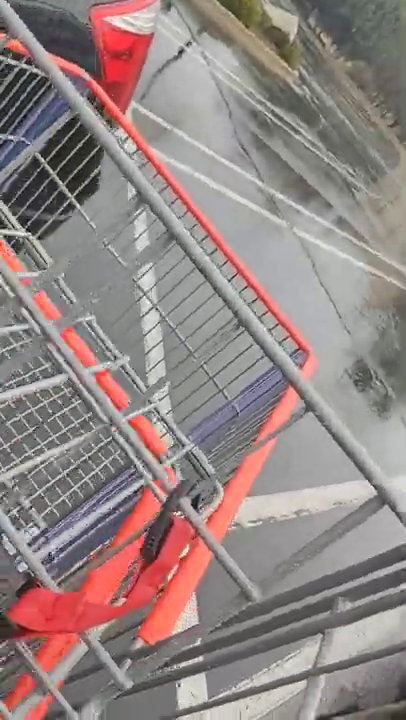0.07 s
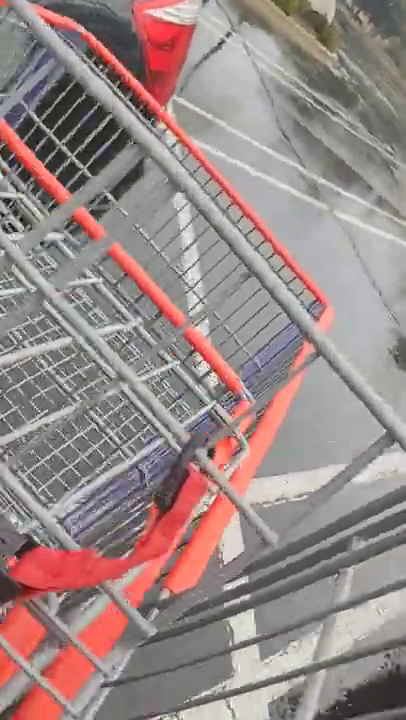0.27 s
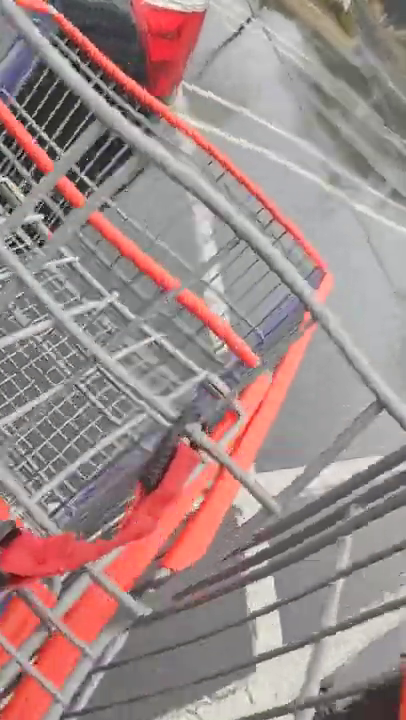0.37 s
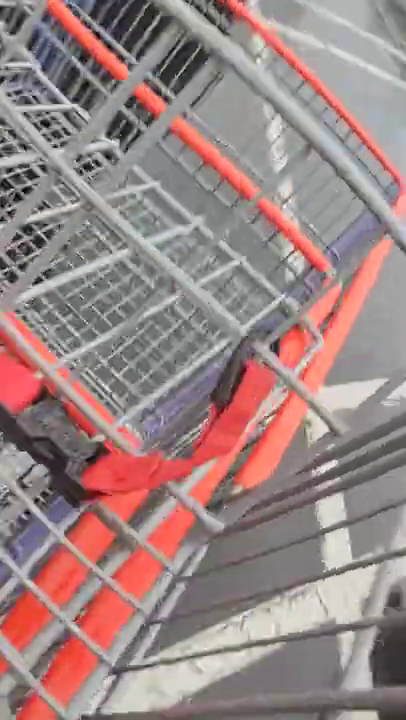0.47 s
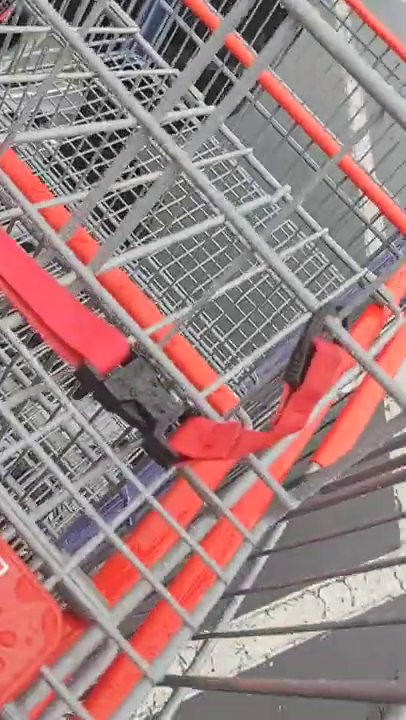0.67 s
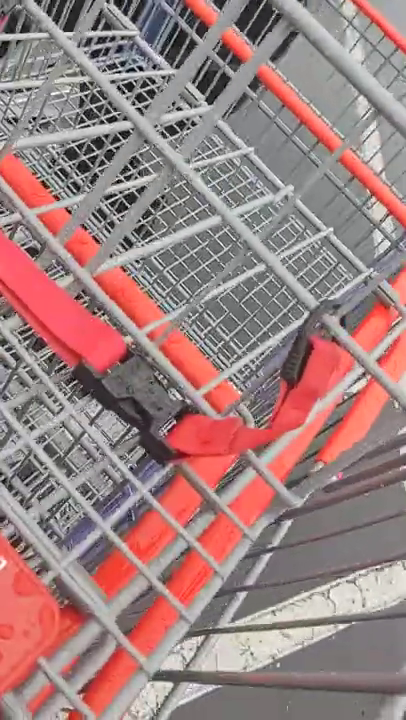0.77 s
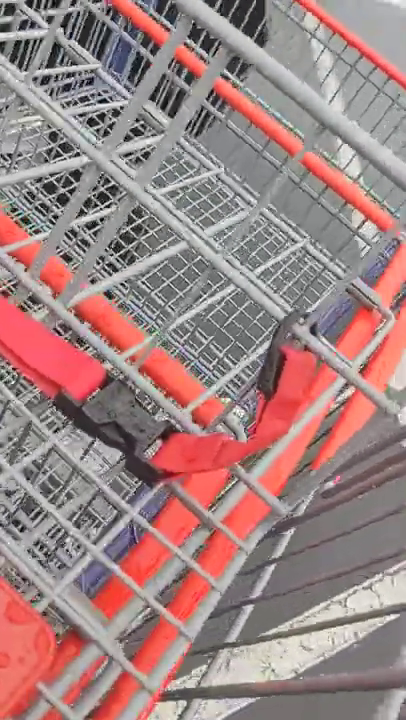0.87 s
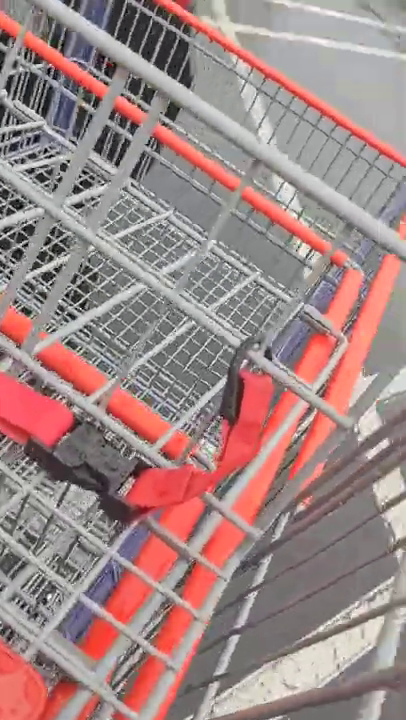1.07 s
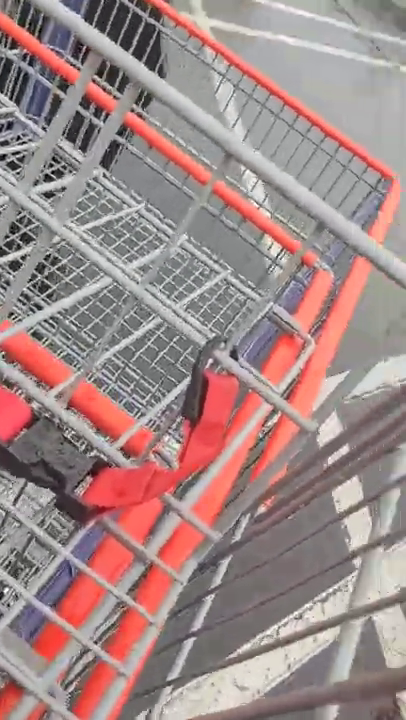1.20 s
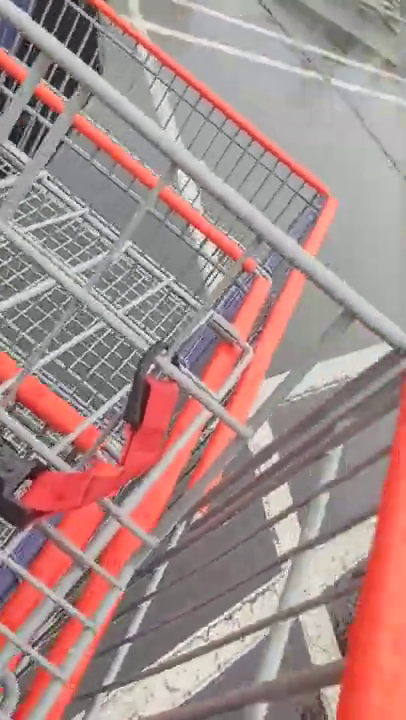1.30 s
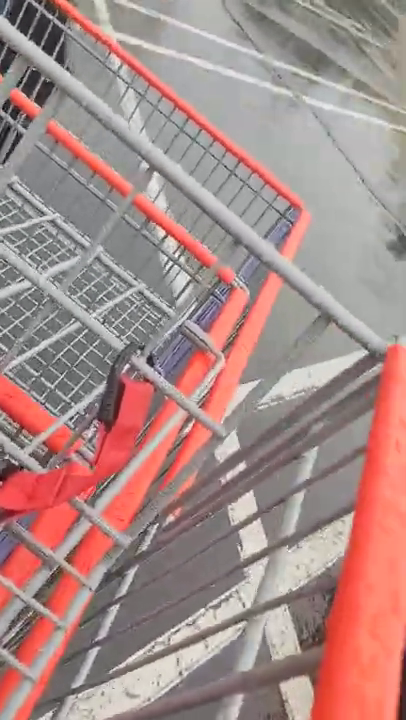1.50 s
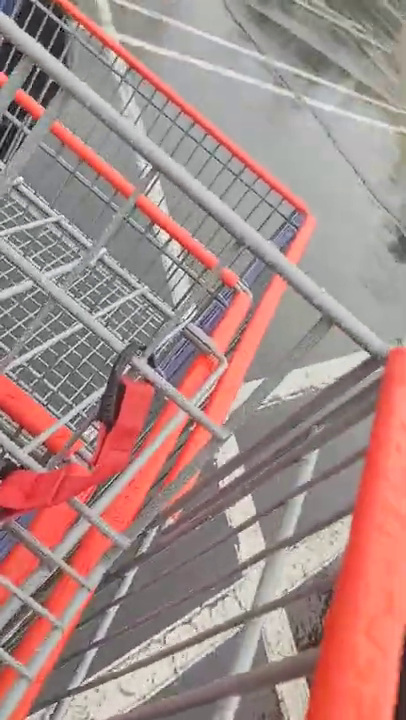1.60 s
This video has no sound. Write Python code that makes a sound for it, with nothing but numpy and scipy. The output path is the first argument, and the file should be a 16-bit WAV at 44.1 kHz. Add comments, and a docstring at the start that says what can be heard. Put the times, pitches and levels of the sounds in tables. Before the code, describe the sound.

Metal shopping trolleys slide into one another with a loud, bright clatter, then rattle faintly.

```python
"""Shopping trolleys nesting in a car park.

Wire trolleys are pushed into one another, close by. Baskets grind and clatter, loose wires chatter
brightly, frames ring; after a lull and a knock the row rolls on. Random contact clicks drive the
metal's resonances. Wheels rumble on asphalt; a low hum, like an idling car, lies under it all."""
import sys
import numpy as np
from scipy import signal
from scipy.fft import rfft, irfft
from scipy.io import wavfile
from scipy.ndimage import uniform_filter1d

SR = 44100
rng = np.random.default_rng(int(sys.argv[2]) if len(sys.argv) > 2 else 0)


def transcribe(u):
    """Save the signal u as a 16-bit wav file named by the first command-line argument.

    u: samples, shape (n,) or (channels, n), limited to [-1, 1]; the rate is SR.
    q: integer samples, one column per channel.
    """
    v = np.clip(np.atleast_2d(u).T, -1, 1)
    q = np.round(v * 32767).astype(np.int16)
    wavfile.write(sys.argv[1], SR, q)


N = 72765
TIME_S = np.arange(N) / SR

# Stereo image. Each row: frequency in Hz, left minus right in dB.
SIDE_DB = [(60, 1), (130, -3), (220, -5), (330, 1.5), (600, 4), (1100, 8), (1700, -2), (2200, -3),
           (2600, 3), (3300, -0.5), (4300, 1.5), (5200, 8), (6300, 1), (7200, 0.5), (8200, -17),
           (10000, -18), (11000, -27), (12300, -22), (13500, -8), (15500, -7)]
# Stereo width. Each row: frequency in Hz, left-right correlation.
CORRELATION = [(60, -0.011), (300, 0.76), (700, 0.51), (1400, 0.31), (2500, -0.17), (5000, 0.022),
               (15000, -0.3)]
# Steady hum. Each row: frequency in Hz, level in dB.
HUM_TONES = [(72, -55.5), (109, -53.5), (210, -56), (281, -63)]
# Diffuse ring of the row. Each row: frequency in Hz, gain on the metal sound in dB.
AFTER_RING_GAIN_DB = [(200, -11.5), (500, 0.5), (1200, -2), (2500, -22), (5000, -23.5), (12000, -30)]

# Source spectra. Each row: frequency in Hz, relative density in dB.
AIR_SPECTRUM = [(120, -25), (200, 0), (344, -5.5), (427, 1), (708, -11.5), (1780, -11.5), (3730, -21),
                (11400, -28), (15000, -29)]
WHEEL_SPECTRUM = [(25, -26), (45, -13), (70, -8.5), (110, 3.5), (170, -2), (230, -3.5), (400, -29),
                  (1000, -62)]
SIZZLE_SPECTRUM = [(500, -37), (5000, -20), (8000, -12), (10000, 1.5), (12500, -1), (14000, -7), (15700, 2)]
CLANK_SPECTRUM = [(40, -44), (250, -5), (550, -4), (1000, -4.5), (1350, 0), (1700, 0), (2050, -1.5),
                  (2650, 1.5), (3200, -4.5), (3700, -34.5), (6500, -7), (14000, -41)]
CHATTER_SPECTRUM = [(60, -46), (1000, -8), (3000, -9), (6800, -13), (8200, -4.5), (9100, -3), (9800, 5),
                    (10900, -8), (12200, -3.5), (13500, -15), (16000, -28)]
BASKET_SPECTRUM = [(40, -45), (200, -11.5), (450, -10.5), (900, -5.5), (1300, -8), (2100, -1.5),
                   (2800, -1.5), (3400, 3.5), (3850, -4), (4400, 0), (5200, -1.5), (5800, -2), (7000, -4.5),
                   (7700, -7.5), (9000, -11), (9900, 0.5), (10800, -12), (12200, -2.5), (13300, -18.5),
                   (15600, -17.5)]

# Source envelopes. Each row: time in seconds, relative level in dB.
WHEEL_LEVEL_DB = [(0.0, -34.5), (0.036, -38), (0.104, -33), (0.206, -37), (0.238, -29.5), (0.936, -49),
                  (1.024, -40.5), (1.046, -56), (1.594, -45), (1.65, -46)]
DRONE_LEVEL_DB = [(0, -57), (0.12, -44.5), (0.42, -40.5), (0.47, -31.5), (0.56, -35), (0.62, -33),
                  (0.70, -37), (0.78, -32.5), (0.92, -47), (1.2, -57), (1.65, -52.5)]
TUBE_LEVEL_DB = [(0, -51), (0.06, -53), (0.075, -39), (0.2, -39.5), (0.24, -30.5), (0.35, -27.5),
                 (0.41, -28.5), (0.49, -25), (0.55, -32.5), (0.6, -27), (0.72, -28), (0.85, -40.5),
                 (1.0, -67), (1.42, -78), (1.48, -43), (1.65, -52)]
SIZZLE_LEVEL_DB = [(0.2, -70), (0.25, -29), (0.40, -50), (0.47, -19), (0.60, -23), (0.72, -28), (0.80, -56),
                   (0.95, -75)]
# Basket rattle in three phases. Each row: time in seconds, relative level in dB.
APPROACH_DB = [(0.0, -57.5), (0.034, -47), (0.064, -54.5), (0.144, -37), (0.162, -51), (0.216, -46)]
NESTING_DB = [(0.236, -19), (0.284, -16.5), (0.424, -26), (0.462, -16.5), (0.69, -19.5), (0.886, -37.5),
              (1.014, -56.5), (1.136, -56), (1.152, -57.5), (1.302, -64.5), (1.34, -35.5), (1.376, -80),
              (1.392, -75), (1.43, -59)]
ROLLING_ON_DB = [(1.445, -38.5), (1.465, -45), (1.625, -44.5), (1.65, -52)]
# Sliding baskets and rubbing frame tube. Each row: time in seconds, pitch in Hz.
DRONE_PITCH_HZ = [(0.1, 318), (0.5, 308), (0.61, 283), (0.69, 322), (0.79, 321), (0.87, 288.5), (1.6, 282)]
TUBE_PITCH_HZ = [(0.07, 1643), (0.36, 1670), (0.5, 1700), (0.6, 1760), (0.72, 1684), (1.55, 1697)]

# Frame tube modes. Each row: frequency in Hz, relative level in dB, T60 in seconds.
FRAME_MODES = [(1371, -8, 0.76), (1440, -9, 0.32), (1540, -2, 0.087), (1615, -7.5, 0.1), (1618, -2, 0.15),
               (1695, -5, 0.1), (1726, -9.5, 0.14), (1787, -1.5, 0.076), (1862, -9.5, 0.067),
               (1849, 2, 0.083), (2540, -5, 0.23), (4370, -8.5, 0.24), (4620, -15, 0.38),
               (5140, -16.5, 0.13)]
# Wheel and frame thuds, frame and gate clanks, wire scrapes.
# Each row: start in seconds, relative level in dB, length in seconds, centre in Hz.
WHEEL_THUDS = [(0.229, -31, 0.056, 183), (0.324, -32, 0.04, 120), (0.467, -35.5, 0.037, 91),
               (0.618, -40, 0.028, 68.4), (1.006, -46, 0.039, 108), (1.63, -37.5, .015, 219)]
FRAME_CLANKS = [(0.125, -32.5, .02, 1510), (0.27, -35.5, 0.031, 770), (1.049, -41, .008, 2650),
                (1.118, -42.5, 0.013, 2660), (1.3135, -41, .005, 1800), (1.328, -33, .012, 1830),
                (1.4365, -32.5, 0.0099, 2290), (1.518, -36, .01, 1000), (1.634, -34, .006, 650)]
WIRE_SCRAPES = [(0.269, -14.5, 0.054, 4740), (0.45, -15.5, .012, 6100), (0.481, -18.5, 0.032, 5170),
                (0.515, -17, 0.057, 4260), (0.586, -20.5, 0.042, 4280), (0.648, -19.5, 0.045, 4500)]
# Loose wires. Each row: start in seconds, relative level in dB, length in seconds.
WIRE_CHATTERS = [(0.026, -34, 0.011), (0.125, -29, 0.0045), (0.142, -22, 0.0068), (0.185, -24, 0.0034),
                 (0.209, -33, 0.006), (0.226, -22.5, 0.0077), (0.241, -11, 0.0082), (0.2584, -9.5, 0.011),
                 (0.3255, -12.5, 0.0055), (0.343, -10.5, 0.0074), (0.3754, -12.5, 0.0055),
                 (0.401, -11, 0.0071), (0.428, -11, 0.007), (0.439, -7, 0.0083), (0.4636, -10.5, 0.0077),
                 (0.4876, -11, 0.0028), (0.5187, -12, 0.0064), (0.5677, -13, 0.0051), (0.614, -16, 0.0079),
                 (0.63, -12.5, 0.003), (0.6654, -11.5, 0.006), (0.7173, -12.5, 0.0045),
                 (0.7748, -11.5, 0.0041), (0.7874, -19, 0.0031), (0.8006, -16.5, 0.0038),
                 (0.8114, -14, 0.0042), (0.8188, -12, 0.0062), (0.842, -20, 0.0038),
                 (0.8636, -15.5, 0.0042), (0.9063, -25.5, 0.0041), (0.9264, -30, 0.006),
                 (0.947, -33, 0.0048), (1.03, -45, 0.0042), (1.097, -48, 0.0086), (1.1204, -56, 0.006),
                 (1.137, -46, 0.006), (1.1837, -46, 0.0042), (1.268, -45.5, 0.0053), (1.337, -31, 0.0048),
                 (1.378, -42, 0.006), (1.469, -30, 0.006), (1.478, -37, 0.0055), (1.511, -27.5, 0.0066),
                 (1.5416, -26.5, 0.006), (1.5662, -29, 0.0091), (1.593, -33.5, 0.0075),
                 (1.633, -31.5, 0.006)]
# Basket strikes basket. Each row: time in seconds, relative strength in dB.
BASKET_KNOCKS = [(0.0281, -21), (0.124, -18.5), (0.222, -5.5), (0.238, 4), (0.276, 6), (0.43, -1),
                 (0.490, 5), (0.650, 3.5), (0.733, 4.5), (0.8643, -12), (1.334, -24), (1.442, -20.5),
                 (1.503, -16.5), (1.639, -20)]

CONTACTS_PER_S, CONTACT_SPREAD_DB = 900, 4.0
BOUNCES_PER_S, BOUNCE_SPREAD_DB = 5000, 3
THIN_WIRE_T60_S, FRAME_SIDE_DB = 0.0078, -3


def from_db(db):
    """Decibels to gain."""
    return 10 ** (np.asarray(db) / 20)


def unit_rms(x):
    """Scale to rms 1."""
    return x / np.sqrt(np.mean(x ** 2) + 1e-20)


def in_time(rows):
    """Breakpoints to a piecewise linear curve."""
    return np.interp(TIME_S, *np.transpose(rows))


def at_hz(rows, hz):
    """Interpolate on a log-frequency axis."""
    row_hz, value = np.transpose(rows)
    return np.interp(np.log(hz + 1), np.log(row_hz), value)


def pan(side_db):
    """Constant-power left and right gains."""
    gains = from_db(np.array([side_db, -side_db]).reshape(2, -1) / 2)
    return gains / np.sqrt(np.mean(gains ** 2, axis=0))


def high_pass(x, hz):
    """Third-order Butterworth bass cut."""
    return signal.sosfilt(signal.butter(3, hz, "high", fs=SR, output="sos"), x)


def noise(spectrum, panned=True):
    """Coloured stereo noise of rms 1, optionally panned band by band."""
    hz = np.fft.rfftfreq(N, 1 / SR)
    mid, side = rfft(rng.standard_normal((2, N)))
    correlation = np.clip(at_hz(CORRELATION, hz), -1, 1)
    stereo = np.sqrt(1 + correlation) * mid + np.sqrt(1 - correlation) * np.array([side, -side])
    coloured = stereo * from_db(at_hz(spectrum, hz))
    return unit_rms(irfft(coloured * pan(at_hz(SIDE_DB, hz) * panned), N))


def decay(t60_s):
    """Exponential decay of unit energy."""
    return unit_rms(from_db(-60 * TIME_S / max(t60_s, 0.001))) / np.sqrt(N)


def burst(start_s, db, length_s, length_over_rise=10.3):
    """Fast linear rise, Gaussian fall."""
    age = np.maximum(TIME_S - start_s, 0) / max(length_s, 0.001)
    return from_db(db) * np.minimum(age * length_over_rise, 1) * np.exp(-age ** 2)


def contacts(per_s=CONTACTS_PER_S, spread_db=CONTACT_SPREAD_DB):
    """Random clicks of uneven strength and sign, levelled to a mean power near 1."""
    touches = rng.random(N) < per_s / SR
    clicks = touches * rng.choice([-1, 1], N) * from_db(spread_db * rng.standard_normal(N))
    local_power = np.abs(uniform_filter1d(clicks ** 2, size=700))
    return clicks / np.sqrt(local_power + 1e-6)


def excite(drive, response):
    """Convolve a drive with a stereo impulse response."""
    return signal.fftconvolve(np.atleast_2d(drive), response, axes=1)[:, :N]


def resonance(pitch_hz, width_hz):
    """Random slips feed one narrow resonance whose pitch may move; stereo, rms 1."""
    pole = np.exp(-np.pi * width_hz / SR)
    slips = np.array([contacts() for ear in range(2)])
    carrier = np.exp(2j * np.pi * np.cumsum(pitch_hz + np.zeros(N)) / SR)
    baseband = (slips + slips.mean(axis=0)) / carrier
    return unit_rms(np.real(carrier * signal.lfilter([1], [1, -2 * pole, pole * pole], baseband)))


def car_park(air_db=-51):
    """Open air and a steady low hum."""
    hum = 0
    for hz, db in HUM_TONES:
        tone = np.sqrt(2) * np.sin(2 * np.pi * (hz * TIME_S + rng.random()))
        hum += from_db(db) * tone * pan(at_hz(SIDE_DB, hz))
    return hum + from_db(air_db) * noise(AIR_SPECTRUM)


def wheels(trim_db=-1.5, thud_width_hz=47):
    """Wheels roll over asphalt and bump now and then."""
    out = from_db(in_time(WHEEL_LEVEL_DB) + trim_db) * noise(WHEEL_SPECTRUM)
    for start_s, db, length_s, hz in WHEEL_THUDS:
        out += burst(start_s, db, length_s) * resonance(hz, thud_width_hz) * pan(at_hz(SIDE_DB, hz))
    return out


def after_ring(metal, t60_s=0.99):
    """The rest of the row and the surroundings ring on, dull and diffuse."""
    gain = from_db(at_hz(AFTER_RING_GAIN_DB, np.fft.rfftfreq(N, 1 / SR)))
    diffuse = irfft(rfft(rng.standard_normal((2, N))) * gain, N)
    return excite(metal, diffuse * decay(t60_s))


def stick_slip(drone_trim_db=-1.5):
    """A frame tube sings and the baskets drone as their contacts stick and slip."""
    tube = from_db(in_time(TUBE_LEVEL_DB)) * resonance(in_time(TUBE_PITCH_HZ), width_hz=140)
    drone_gain = from_db(in_time(DRONE_LEVEL_DB) + drone_trim_db)
    drone = drone_gain * resonance(in_time(DRONE_PITCH_HZ), width_hz=54)
    return tube * pan(FRAME_SIDE_DB) + drone * pan(side_db=2)


def frame_ring(rattle_db, drive_db=-28, db_per_rattle_db=0.92):
    """The rattle rings the frame's modes, each with its own clicks and its own phase per ear."""
    drive = from_db(drive_db + db_per_rattle_db * (rattle_db - rattle_db.max()))
    out = 0
    for hz, db, t60_s in FRAME_MODES:
        phase_rad = rng.uniform(-1.43, 1, (2, 1))
        mode = np.sin(2 * np.pi * hz * TIME_S + phase_rad) * decay(t60_s)
        out += from_db(db) * excite(drive * contacts(), mode)
    return out * pan(FRAME_SIDE_DB)


def clanks(rattle_db, places=3, drive_db=-28.5, db_per_rattle_db=0.56, focus_db_per_oct=8, t60_s=0.13):
    """Frames and gates clank hollowly: a bed following the rattle, plus single pitched clanks."""
    bed = from_db(drive_db + db_per_rattle_db * (rattle_db - rattle_db.max())) / np.sqrt(places)
    parts = [(bed, CLANK_SPECTRUM)] * places
    for start_s, level_db, length_s, centre_hz in FRAME_CLANKS:
        focused = [(hz, db - focus_db_per_oct * abs(np.log2(hz / centre_hz)))
                   for hz, db in CLANK_SPECTRUM]
        parts.append((burst(start_s, level_db, length_s), focused))
    out = 0
    for drive, spectrum in parts:
        clicks = drive * contacts(2 * CONTACTS_PER_S, BOUNCE_SPREAD_DB)
        out += excite(clicks, noise(spectrum, panned=False) * decay(t60_s))
    return out


def sizzle():
    """Mesh slides on mesh: a stream of tiny bright ticks."""
    ticks = from_db(in_time(SIZZLE_LEVEL_DB)) * contacts()
    return excite(ticks, noise(SIZZLE_SPECTRUM) * decay(THIN_WIRE_T60_S))


def scrapes(width_oct=0.74, t60_s=0.066):
    """Wire scrapes along wire: fast slips excite modes around a centre pitch."""
    skirt = [(-3, -60), (-1, -24), (0, 0), (1, -24), (3, -60)]  # widths off centre, dB
    out = 0
    for start_s, level_db, length_s, centre_hz in WIRE_SCRAPES:
        wire = noise([(centre_hz * 2 ** (widths * width_oct), db) for widths, db in skirt])
        slips = burst(start_s, level_db, length_s) * contacts(BOUNCES_PER_S, BOUNCE_SPREAD_DB)
        out += excite(slips, wire * decay(t60_s))
    return out


def chatter(wires=8, trim_db=-3.5):
    """Thin, bright loose wires bounce rapidly for a few milliseconds at a time."""
    out = 0
    for wire in range(wires):
        drive = from_db(trim_db) * sum(burst(*row) for row in WIRE_CHATTERS[wire::wires])
        bounces = drive * contacts(BOUNCES_PER_S, BOUNCE_SPREAD_DB)
        out += excite(bounces, noise(CHATTER_SPECTRUM) * decay(THIN_WIRE_T60_S))
    return out


def baskets(rattle_db, places=7, trim_db=1, knock_boost_db=5, crack_db=-3.5):
    """Wires skip and baskets knock at several places; each answers with a crack and dense modes."""
    crack_gain = from_db(crack_db)
    envelope = np.hypot(decay(t60_s=0.13), crack_gain * decay(t60_s=0.011)) / np.hypot(1, crack_gain)
    drive = from_db(rattle_db + trim_db) / np.sqrt(places)
    out = 0
    for place in range(places):
        clicks = drive * contacts(CONTACTS_PER_S / places)
        for time_s, db in BASKET_KNOCKS[place::places]:
            clicks[int(time_s * SR)] += from_db(db + trim_db + knock_boost_db)
        out += excite(clicks, noise(BASKET_SPECTRUM) * envelope)
    return out


def scene():
    """Trolley metal and its after-ring over wheels and car park."""
    rattle_db = in_time([*APPROACH_DB, *NESTING_DB, *ROLLING_ON_DB])
    metal = baskets(rattle_db) + clanks(rattle_db) + scrapes() + chatter() + sizzle()
    metal += frame_ring(rattle_db) + stick_slip()
    metal = high_pass(metal, hz=169)  # thin wire radiates little bass
    return metal + after_ring(metal) + wheels() + car_park()


def record(dry, low_cut_hz=55, high_cut_hz=15800):
    """Bass cut, clip at full scale, steep treble cut."""
    clipped = np.clip(high_pass(dry, low_cut_hz), -1, 1)
    hz = np.fft.rfftfreq(2 * N, 1 / SR)
    return irfft(rfft(clipped, 2 * N) / (1 + (hz / high_cut_hz) ** 400))[:, :N]


dry = scene()
out = record(dry)
transcribe(out)
```